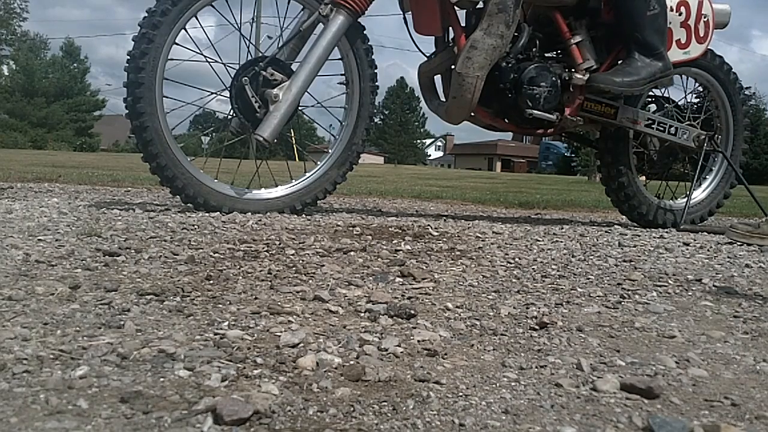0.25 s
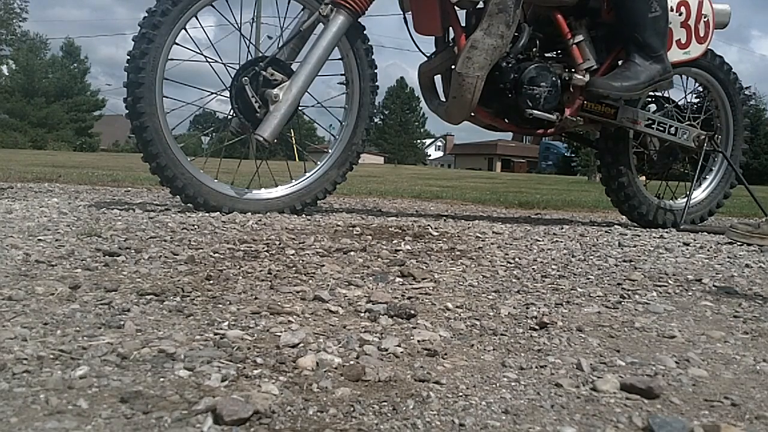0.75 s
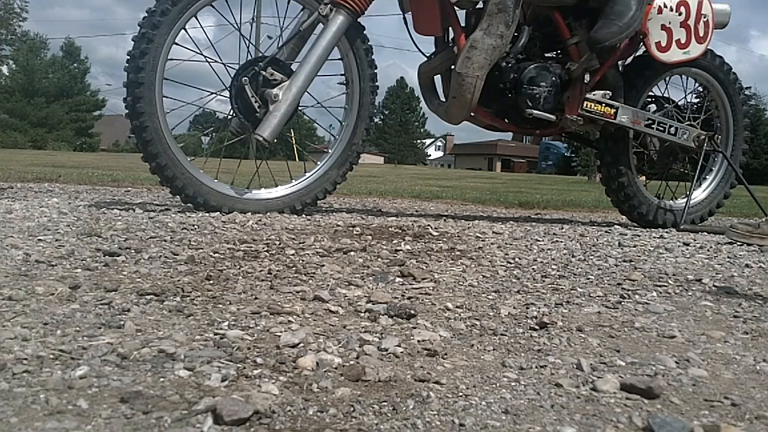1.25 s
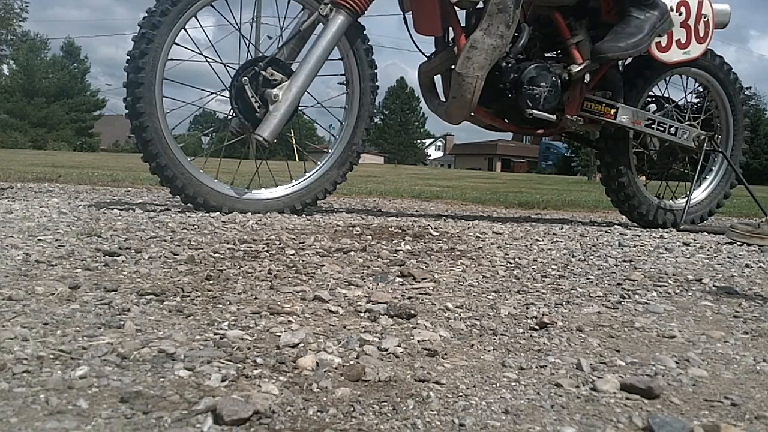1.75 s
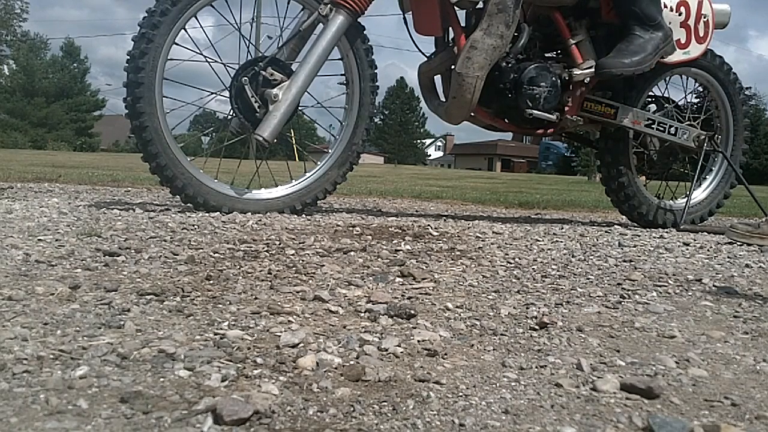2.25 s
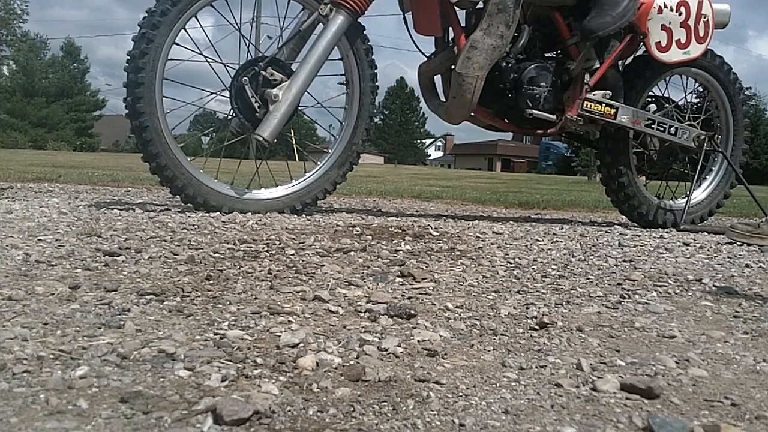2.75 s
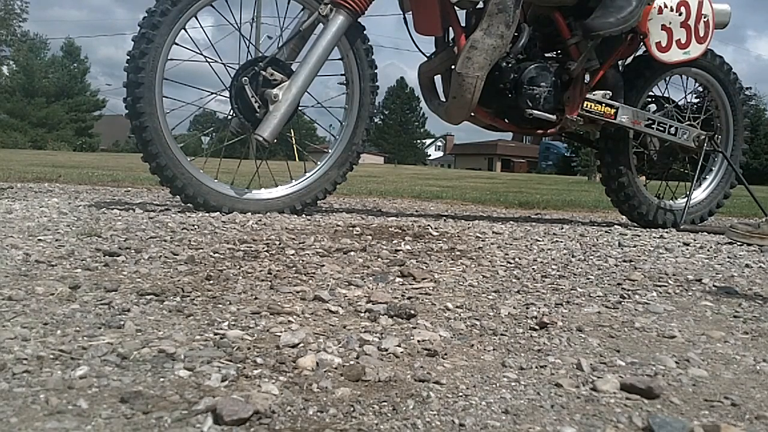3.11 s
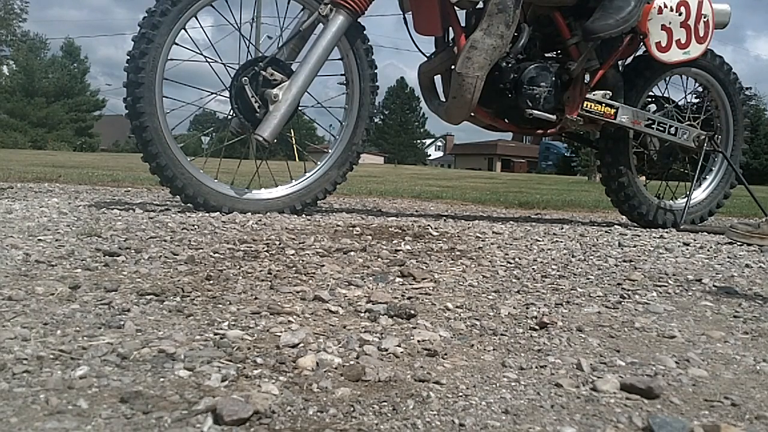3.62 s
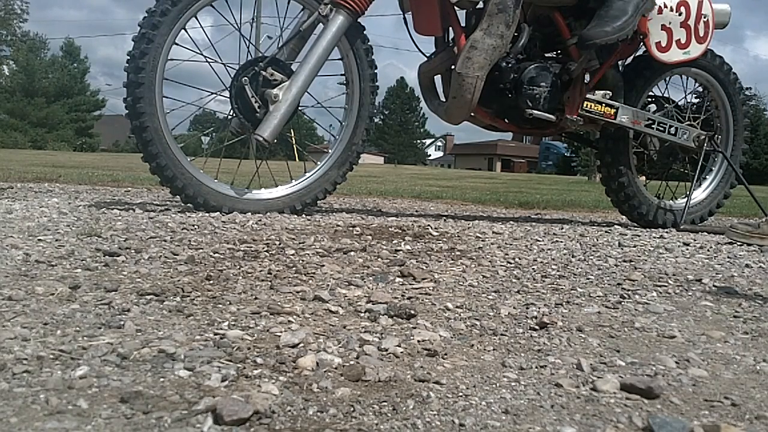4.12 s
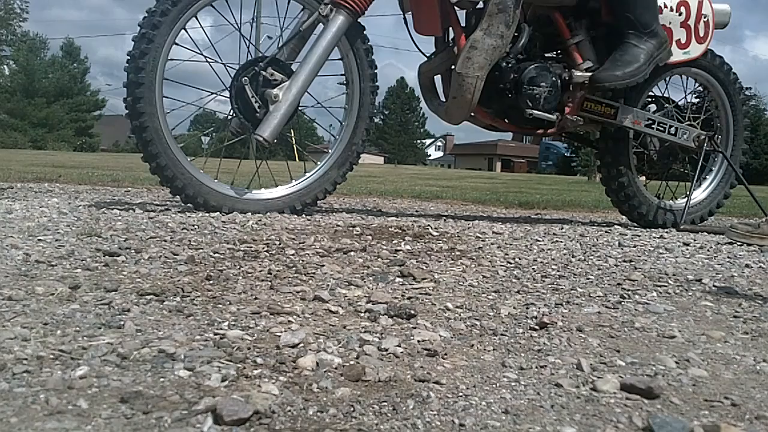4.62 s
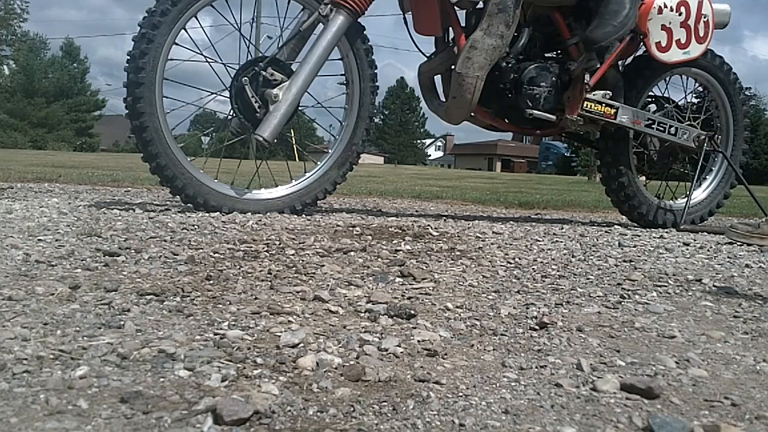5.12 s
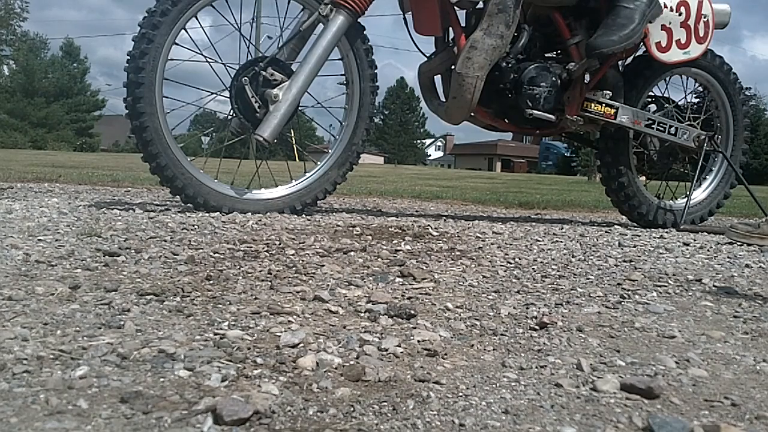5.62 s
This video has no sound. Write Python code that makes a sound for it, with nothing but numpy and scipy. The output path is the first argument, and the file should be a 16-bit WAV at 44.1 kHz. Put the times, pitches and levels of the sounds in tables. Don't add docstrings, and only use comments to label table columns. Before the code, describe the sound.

Three kicks at a dirt bike's starter lever, each a hard double metal clack with ratchet ticks and gear rattle; the engine never catches.

```python
import sys
import numpy as np
from scipy import signal
from scipy.fft import rfft, irfft
from scipy.io import wavfile
from scipy.ndimage import uniform_filter1d

SR = 44100
rng = np.random.default_rng(int(sys.argv[2]) if len(sys.argv) > 2 else 0)


def gain_from_decibels(decibels):
    exponent = np.asarray(decibels, float) / 20
    return 10 ** exponent


def generate_wav(sig):
    pcm = np.round(np.clip(np.atleast_2d(sig).T, -1, 1) * 32767).astype(np.int16)
    wavfile.write(sys.argv[1], SR, pcm)


N = 258426
T = np.arange(N) / SR


def rms1(x):
    return x / np.sqrt(np.mean(x ** 2))


def band(x, lo_hz, hi_hz, order=2):
    sos = signal.butter(order, [lo_hz, hi_hz], "bandpass", fs=SR, output="sos")
    return signal.sosfilt(sos, x)


def noise(lo_hz, hi_hz):
    return rms1(band(rng.standard_normal(N), lo_hz, hi_hz))


def walk(rate_hz):
    hold = int(SR / rate_hz)
    steps = np.repeat(rng.standard_normal(N // hold + 1), hold)
    return 1.62 * uniform_filter1d(uniform_filter1d(steps, hold), hold)[:N]


def add(out, start_s, x):
    i = int(start_s * SR)
    out[i:i + len(x)] += x[:N - i]


def rattle():
    # start_s, fastest_s, stop_s, effort_db, brightness_db
    strokes = [(-.1, 0.006, 0.31, -63, 2.5), (.93, 1.125, 1.37, -58, 1), (1.4, 1.5, 1.7, -67, 2),
               (1.966, 2.14, 2.31, -63.5, 3), (2.526, 2.61, 2.78, -58.5, -2), (2.656, 2.744, 3.2, -61, -1),
               (4.555, 4.62, 4.67, -63, -1), (4.692, 4.79, 4.89, -53, 0.1), (4.855, 5, 5.8, -59.5, 1.5),
               (5.3, 5.445, 4.95, -71, 0), (5.503, 5.598, 5.67, -64.5, -1)]
    rest_db = -15
    dull_db, bright_db, rumble_db = -4, 1.6, 2
    effort, bright = np.zeros((2, N))
    for start_s, fastest_s, stop_s, effort_db, tilt_db in strokes:
        moving = np.clip(np.minimum(T - start_s, stop_s - T) / 0.0083, 0, 1)
        speed_db = np.interp(T, [start_s, fastest_s, stop_s], [rest_db, 0, rest_db])
        gain = moving * gain_from_decibels(effort_db + speed_db)
        effort = effort + gain * gain_from_decibels(-tilt_db)
        bright = bright + gain * gain_from_decibels(tilt_db)
    fine_grain, coarse_grain = gain_from_decibels(3.0 * walk(250)), gain_from_decibels(3.1 * walk(120))
    dull = gain_from_decibels(dull_db) * effort * noise(230, 1500) * coarse_grain
    sharp = gain_from_decibels(bright_db) * bright * rms1(fine_grain * noise(2030, 6500))
    rumble = gain_from_decibels(rumble_db) * np.sqrt(effort * bright) * noise(130, 301)
    return dull + sharp + rumble


def wind():
    # time_s, buffet_db
    buffets = [(0.0, -51), (0.62, -45.5), (0.68, -37), (0.9, -33), (1.01, -59), (1.32, -34.5), (1.35, -45),
               (2.12, -58.5), (2.28, -50), (2.64, -59.5), (2.94, -53), (3.08, -38.5), (3.15, -50),
               (4.02, -58), (4.63, -51.5), (5.07, -55), (5.66, -49.5), (5.86, -55.5)]
    # start_s, peak_db, length_ms
    eddies = [(0.204, -49.5, 19), (0.359, -46, 12), (.475, -40, 52), (.56, -49, 32), (0.649, -48.5, 17),
              (0.683, -29, 18), (0.715, -41, 8.1), (0.742, -30, 11), (0.767, -30, 14.6),
              (0.79, -27.5, 12.2), (0.845, -25, 15), (0.871, -33, 18), (0.886, -32.5, 8.5),
              (1.165, -33.5, 71), (1.194, -34.5, 10.6), (1.252, -45, 14), (1.278, -47, 14),
              (1.305, -27, 15.3), (1.363, -34.5, 10), (1.403, -36, 13), (1.443, -36.5, 8.5),
              (1.619, -43, 29), (1.67, -43.5, 40), (1.779, -46, 32), (3.33, -42, 24.5), (3.002, -51, 9.9),
              (3.069, -47, 18), (3.086, -47, 18), (5.394, -50, 7.6), (5.634, -45, 10)]
    calm_db = -55.5
    deep_db, deep_swing = -3.5, 1
    flutter_db, flutter_swing = -4.5, 0.72
    gust_db = np.interp(T, *np.transpose(buffets)) - calm_db
    deep = gain_from_decibels(deep_db + deep_swing * gust_db) * rms1(gain_from_decibels(1.66 * walk(14)) * noise(13.8, 39.8))
    flutter = gain_from_decibels(flutter_db + flutter_swing * gust_db) * rms1(gain_from_decibels(3.3 * walk(28)) * noise(52.0, 95.6))
    out = gain_from_decibels(calm_db) * (deep + flutter)
    sides = np.sign(rng.standard_normal(len(eddies)))
    for (start_s, peak_db, length_ms), side in zip(eddies, sides):
        u = T[:int(.2 * SR)] / (max(length_ms, 3) / 1000)
        push = np.sin(2 * np.pi * u ** 0.72) * np.minimum(4 * u, 1) * np.exp(-1.5 * u)
        add(out, start_s, side * gain_from_decibels(peak_db + 5.5) * push)
    return out


def air():
    # freq_hz, density_db (per Hz)
    spectrum = [(46, -12.5), (62, -1.5), (90, -6), (170, -9.5), (340, -14), (800, -17), (1600, -23),
                (2700, -25.5), (4500, -23.5), (6200, -23.5), (8000, -34), (10000, -31.5), (12500, -33.5),
                (15500, -36.5)]
    hz, db = np.transpose(spectrum)
    shape = gain_from_decibels(np.interp(np.log(np.fft.rfftfreq(N, 1 / SR) + 1), np.log(hz), db))
    hiss = rms1(irfft(rfft(rng.standard_normal(N)) * shape, N))
    return gain_from_decibels(-57 + .5 * walk(1.33)) * hiss


def sensor():
    # freq_hz, level_db
    whine = [(11538.4, -78), (13966, -78), (14565.4, -83), (15194.9, -85)]
    frame_hz = 29.97
    readout, sync = .385, (.39, .885)
    phase = T * frame_hz % 1
    tones = sum(gain_from_decibels(db) * np.sqrt(2) * np.sin(2 * np.pi * hz * T) for hz, db in whine)
    hiss = gain_from_decibels(-80) * noise(12000, 17000)
    ticks = 1. * sum(np.diff((phase - share) % 1, prepend=0) < 0 for share in sync)
    tick_sound = gain_from_decibels(-48) * band(ticks, 6500, 10000) + gain_from_decibels(-52) * band(ticks, 11500, 14000)
    return (tones + hiss) * (phase < readout) + tick_sound


def ring(push, modes, t):
    hz, db, t60_s = np.transpose(modes)[:, :, None]
    detune = .01 * rng.standard_normal((len(modes), 1))
    strength_db = 2 * rng.standard_normal((len(modes), 1))
    tones = np.sin(2 * np.pi * hz * (1 + detune) * t)
    response = gain_from_decibels(db + strength_db) * tones * 1000. ** (-t / t60_s)
    struck = signal.fftconvolve(push, response.sum(axis=0))[:len(t)]
    return band(struck, .6 * hz.min(), 1.3 * hz.max())


def blow(part_db, contact_ms, rise, loose_db, loose_t60_s, echo_db):
    # freq_hz, level_db, t60_s
    lever_modes = [(3130, -3, 0.012), (3510, -11, 0.036), (4006, -7.5, 0.015), (4240, 0, 0.013),
                   (4730, 6.5, 0.0049), (4900, 2, 0.004), (4970, -8, 0.013)]
    pawl_modes = [(6220, -25, 0.026), (5945, 5, 0.0057), (6500, -4, 0.012), (6790, -15, 0.005),
                  (7340, -17.5, 0.017)]
    case_modes = [(1024, -11.5, 0.16), (1210.5, 3.5, 0.043), (1368, 10, 0.013), (1484, -5.5, 0.025),
                  (1790, -8, 0.076), (2150, -9, 0.075)]
    cover_modes = [(429, 0.5, 0.029), (553, 3.5, 0.067), (645.6, -2.5, 0.1), (818, -2, 0.072)]
    scrape_db = -12.5
    t = T[:int(.2 * SR)]
    width_s = max(contact_ms, .2) / 1000
    hiss = rng.standard_normal((2, len(t)))
    contact = hiss[0] * np.minimum(t / (rise * width_s), 1) * np.exp(-(t / width_s) ** 2)
    decay = 1000. ** (-t / loose_t60_s) + gain_from_decibels(echo_db) * 1000. ** (-t / 0.2)
    loose = gain_from_decibels(loose_db) * hiss[1] * np.minimum(t / width_s, 1) * decay
    push, snap = contact + loose, contact + gain_from_decibels(-9) * loose
    parts = [ring(push, lever_modes, t), ring(snap, pawl_modes, t),
             ring(push, case_modes, t), ring(push, cover_modes, t),
             band(snap, 9630, 14700),
             band(push, 1480, 10900)]
    levels_db = [*part_db, part_db[0] + scrape_db]
    return sum(gain_from_decibels(db) * part / np.abs(part).max() for db, part in zip(levels_db, parts))


def teeth_and_knocks():
    # start_s, peak_db, pawl_db (against peak)
    teeth = [(0.037, -44, -19), (1.008, -32.5, 0), (1.4735, -37.5, -6), (1.4916, -39, -11),
             (1.5005, -45, -20), (1.5538, -49, -1), (1.5944, -49, -15), (1.6906, -51, -21),
             (1.9809, -53, -16), (2.568, -41.5, -14), (2.59, -38.5, -9.5), (2.9391, -40.5, -22),
             (3.44, -53, -17), (3.721, -48, -6), (4.803, -39.5, -3), (4.8194, -46, -20),
             (4.9067, -34.5, -7), (4.9263, -33.5, -6), (5.305, -41, -11), (5.3117, -35, -7),
             (5.3297, -34.5, -10), (5.5837, -36.5, -10), (5.6985, -37, -9.5)]
    # start_s, peak_db, case_db, cover_db (both against peak)
    knocks = [(0.9702, -52, 1.5, -7), (1.0231, -55, -6, 14.5), (1.479, -32.5, -6.5, -4),
              (1.5448, -45.5, -12, -1.5), (2.0569, -39.5, -3.5, 1.5), (2.0626, -34.5, -10, -6),
              (2.0789, -51, -1, -10), (2.118, -51, -15, -2), (2.591, -48.5, -7, 7.5),
              (2.6269, -53, 7.5, 10.5), (4.663, -57, -9, 1), (4.035, -50, -6, -15), (4.772, -46.5, 1, 0),
              (4.7836, -45, -1, -3), (4.7957, -38.5, -5.5, -3), (4.8857, -48, -10, 4.5),
              (5.6071, -50, -12, 0), (5.6784, -49, -6, -4), (5.686, -33, -10.5, -5)]
    # time_s, level_db
    grit = [
        (1.55, -65),
        (3.03, -66),
        (5.4, -65),
    ]
    tooth_ms, tooth_case_db, tooth_cover_db = 4.1, -9.5, -11
    knock_ms, knock_pawl_db = 3.34, -10
    ticks = [(s, db, pawl + 4.5, tooth_case_db, tooth_cover_db, tooth_ms) for s, db, pawl in teeth]
    ticks += [(s, db, knock_pawl_db, case + 3.8, cover, knock_ms) for s, db, case, cover in knocks]
    out = np.zeros(N)
    for start_s, peak_db, pawl_db, case_db, cover_db, ms in ticks:
        part_db = peak_db + np.array([1.5, pawl_db, case_db, cover_db, -24])
        add(out, start_s, blow(part_db, ms, rise=.7, loose_db=-6.5, loose_t60_s=0.033, echo_db=-17.5))
    whisper = sum(gain_from_decibels(db) * np.exp(-((T - s) / 0.017) ** 2) for s, db in grit)
    return out + noise(8900, 12000) * whisper


def birds():
    # start_s, length_s, start_hz, end_hz, level_db
    chirps = [
        (.425, .045, 5050, 4750, -61),
        (.43, .035, 3000, 3400, -61),
        (.555, .052, 5120, 4800, -60),
        (.567, .042, 3000, 3500, -60),
        (1.808, .025, 3900, 2750, -47),
        (1.816, .018, 6300, 5650, -62),
        (1.79, .022, 4300, 3950, -61),
    ]
    out = np.zeros(N)
    for start_s, length_s, start_hz, end_hz, level_db in chirps:
        t = T[:int(length_s * SR)]
        swell = gain_from_decibels(level_db - 1 + walk(200)[:len(t)]) * np.sin(np.pi * (t / length_s) ** 1.3) ** .6
        glide_hz = start_hz + (end_hz - start_hz) * t / length_s
        add(out, start_s, swell * np.sin(2 * np.pi * np.cumsum(glide_hz) / SR))
    return out


def chuffs():
    # start_s, length_s, pipe_hz, level_db, overtone_db
    puffs = [(1.481, 0.039, 428, -56, 9), (1.402, 0.024, 430, -60, 3.5), (1.505, 0.038, 243, -49, -14),
             (2.058, 0.051, 327, -60, 8.5), (2.64, 0.047, 303, -59.5, -6), (2.894, 0.023, 151, -42.5, -24),
             (4.11, 0.015, 160, -47, -30), (4.111, 0.016, 332, -51.5, -4.5), (4.04, .025, 282, -63, -3.5),
             (4.635, 0.125, 480, -64, 7.5), (0.997, 0.049, 570, -59, 8), (4.88, 0.063, 625, -59, 0.5),
             (4.593, 0.04, 149, -51, -13), (4.658, 0.041, 212, -37.5, -35), (4.705, 0.027, 915, -62, 6),
             (4.757, 0.046, 189.7, -38, -7.5), (4.786, 0.0545, 242.5, -37.5, -14),
             (5.213, 0.012, 202, -44, -10), (5.225, 0.027, 189, -52.5, -6), (5.316, 0.024, 347, -49.5, -2),
             (5.336, 0.036, 211, -45, -8.5), (5.68, 0.022, 440, -53.5, 8), (5.707, 0.051, 234.9, -46, -14)]
    out, waver = np.zeros(N), walk(90)
    breath, rush = noise(310, 760), noise(90, 480)
    for start_s, length_s, pipe_hz, level_db, overtone_db in puffs:
        t, i = T[:int(length_s * SR)], int(start_s * SR)
        here = slice(i, i + len(t))
        swell = np.sin(np.pi * (t / length_s) ** 0.6) ** 0.6
        w = waver[here]
        note_hz = pipe_hz * (1 + .09 * (w - w.mean()))
        note = rms1(gain_from_decibels(2 * w[::-1]) * np.sin(2 * np.pi * np.cumsum(note_hz) / SR))
        puff = note + gain_from_decibels(overtone_db) * breath[here] + gain_from_decibels(-11) * rush[here]
        add(out, start_s, gain_from_decibels(level_db) * swell * puff)
    return out


def lever_stop():
    # start_s, peak_db, pawl_db, case_db, cover_db (last three against peak)
    clacks = [
        (1.092, -17, 2, -13, -17),
        (1.1604, -19, 8, -9.5, -15),
        (2.7001, -20, 1, -7, -13),
        (2.807, -18.5, -7, -11.5, -23.5),
        (5.007, -15, 1.5, -14.5, -20.5),
        (5.0817, -18, -2, -11, -15.5),
    ]
    crack_db, crack_per_ping = -11.5, 0.38
    lift_db = np.array([2, 5, 3, 1, 5])
    out, t = np.zeros(N), T[:int(.006 * SR)]
    for start_s, peak_db, pawl_db, case_db, cover_db in clacks:
        against_db = np.array([0, pawl_db, case_db, cover_db, crack_db - crack_per_ping * pawl_db])
        clack = blow(peak_db + lift_db + against_db, contact_ms=1.6, rise=0.25,
                     loose_db=-5, loose_t60_s=0.037, echo_db=-25)
        add(out, start_s, clack)
        skid = t / t[-1] * band(rng.standard_normal(len(t)), 1500, 6900)
        add(out, start_s - t[-1], gain_from_decibels(peak_db - 18.5) * skid)
    return out


def scene():
    mix = rattle() + wind() + air() + teeth_and_knocks() + birds() + chuffs() + lever_stop()
    return mix[None]


def roll_off(x):
    return signal.sosfilt(signal.butter(12, 16650, fs=SR, output="sos"), x)


def record(dry):
    # centre_hz, width_hz, depth_db
    ports = [(2720, 700, -30), (5490, 400, -24), (7900, 1500, -20), (10900, 480, -17)]
    top_hz = 15300
    hz = np.fft.rfftfreq(N, 1 / SR)
    notches = [(1j * (hz - f) + w * gain_from_decibels(db)) / (1j * (hz - f) + w) for f, w, db in ports]
    spectrum = rfft(dry) * np.prod(notches, axis=0) + rfft(sensor())
    is_top = hz >= top_hz
    top = irfft(spectrum * is_top, N)
    loud = uniform_filter1d(top ** 2, size=256) > gain_from_decibels(-66) ** 2
    gated = top * uniform_filter1d(1. * loud, size=256)
    kept = irfft(rfft(gated) * is_top * (hz < 16600), N)
    main = irfft(spectrum * (hz < top_hz), N)
    return roll_off(main + gain_from_decibels(-16) * kept)


dry = scene()
out = record(dry)
generate_wav(out)
```